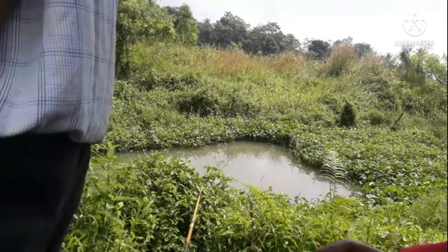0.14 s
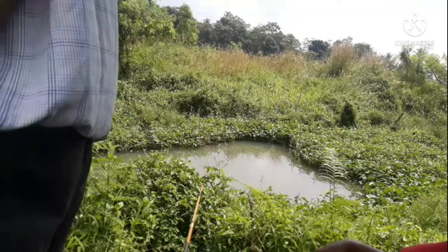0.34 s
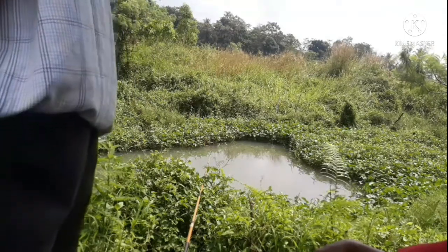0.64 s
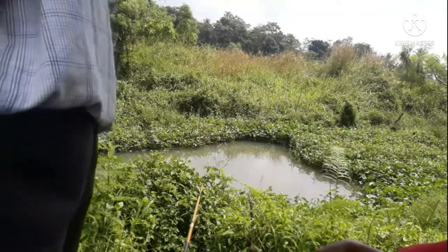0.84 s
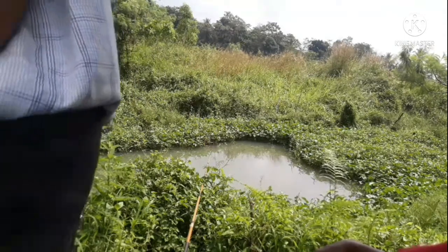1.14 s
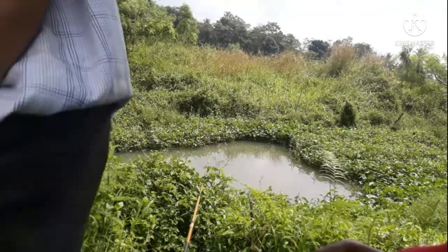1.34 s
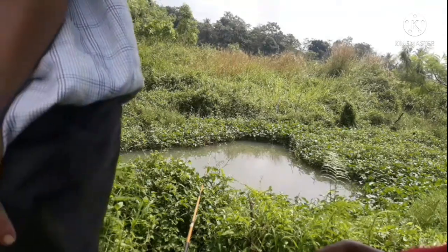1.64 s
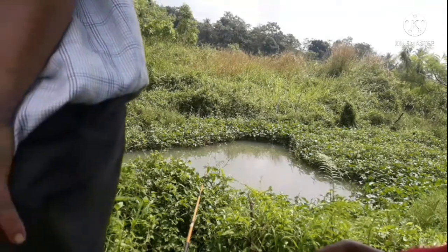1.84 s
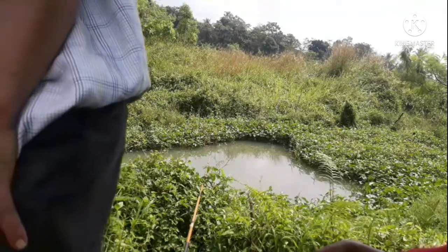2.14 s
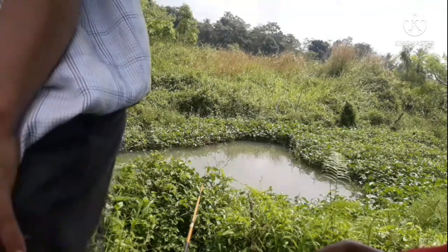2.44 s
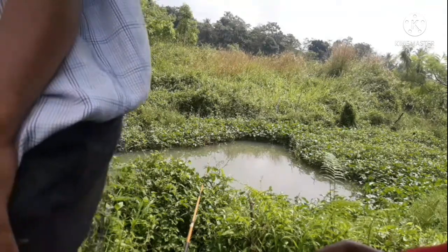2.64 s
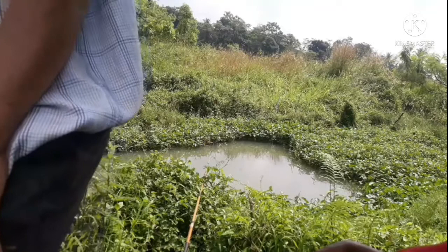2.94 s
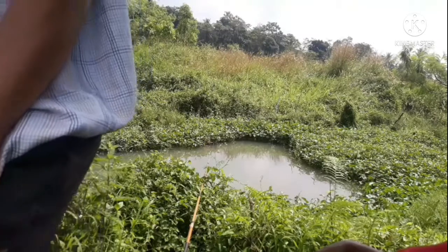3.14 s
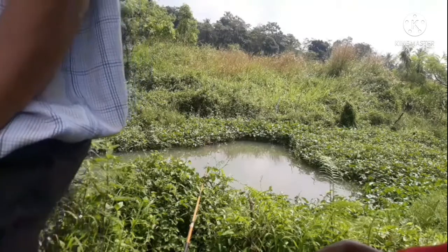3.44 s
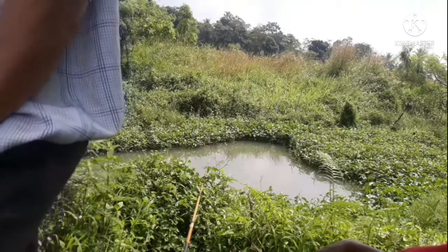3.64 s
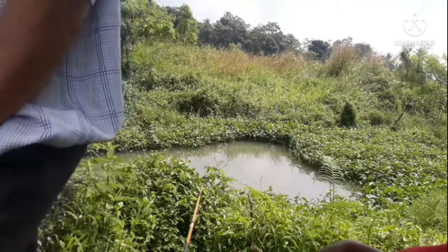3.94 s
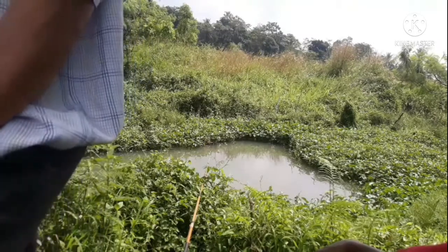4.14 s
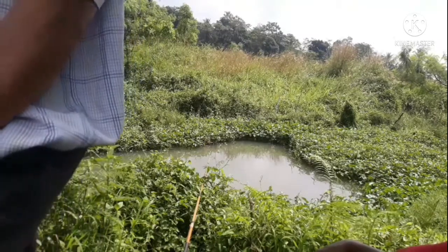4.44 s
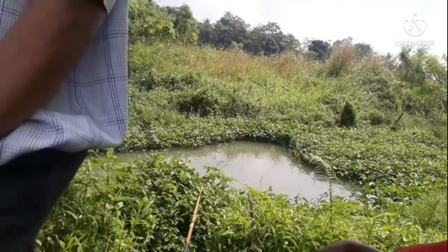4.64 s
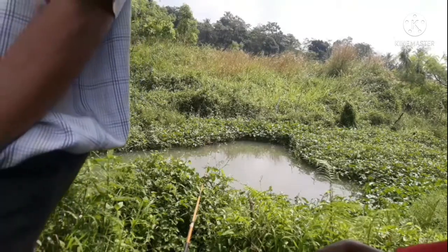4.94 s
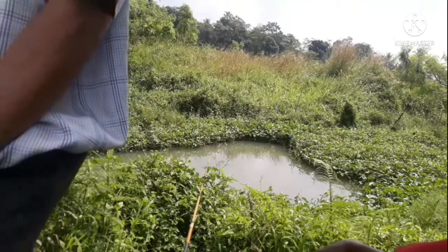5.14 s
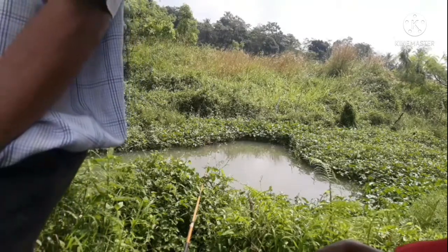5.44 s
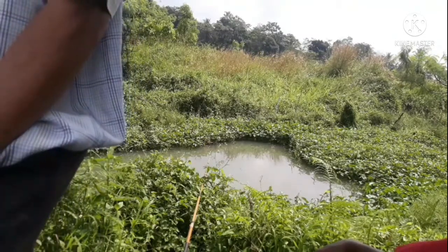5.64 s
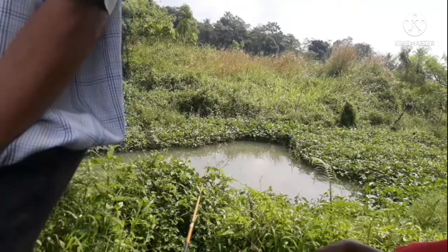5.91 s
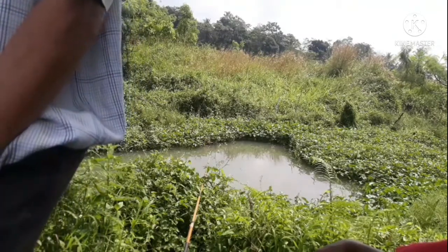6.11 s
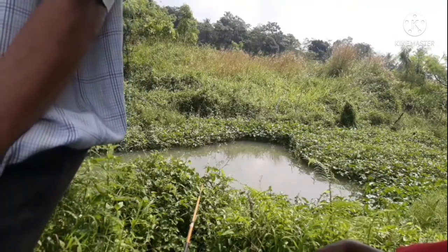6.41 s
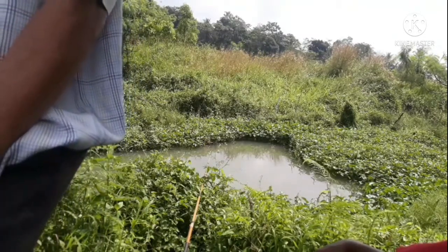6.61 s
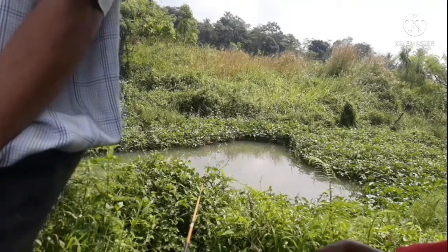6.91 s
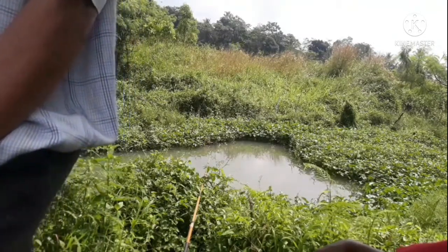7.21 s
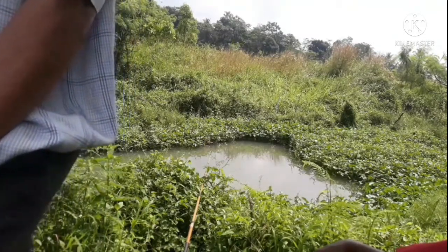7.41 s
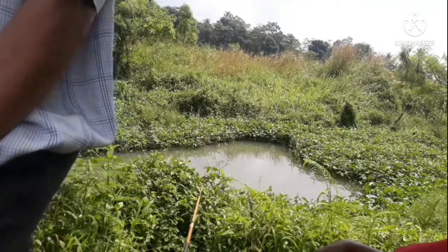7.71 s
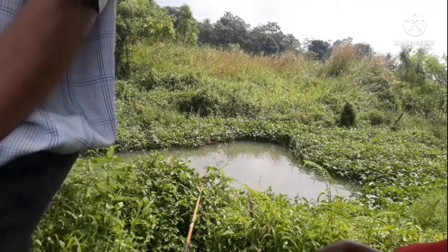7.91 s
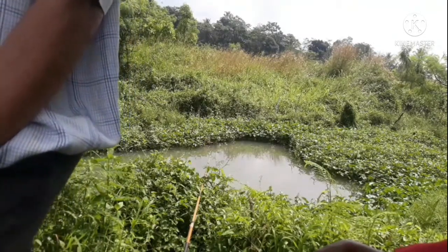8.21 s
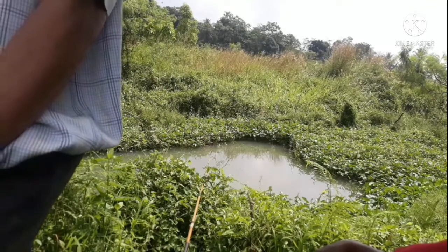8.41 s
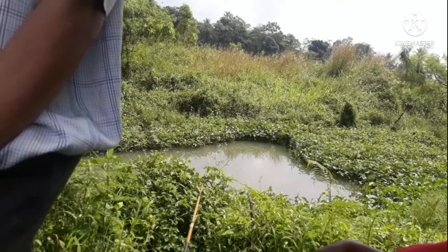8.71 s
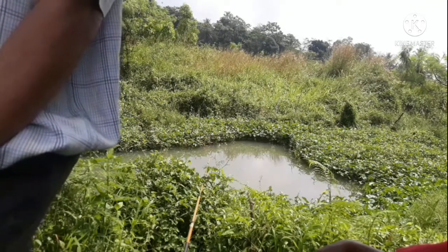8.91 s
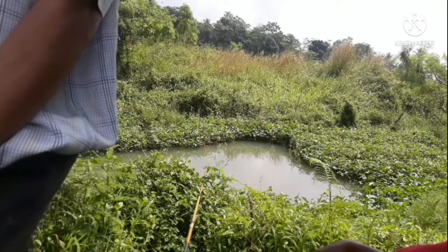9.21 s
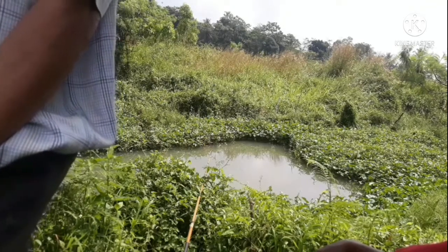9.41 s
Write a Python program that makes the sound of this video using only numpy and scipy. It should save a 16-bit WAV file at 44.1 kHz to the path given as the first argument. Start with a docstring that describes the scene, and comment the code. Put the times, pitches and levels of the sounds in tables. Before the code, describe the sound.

Insects buzz continuously in the weeds by a pond while wind buffets the microphone and faraway birds chirp now and then.

```python
"""An overgrown pond on a breezy day, heard on one microphone. In the weeds a chorus of insects drones
near 5 kHz, each pulsed by its own fast strokes; a thinner, higher one sings in bouts. Small birds
chirp at a distance, scattered by the bushes; there is one low far hoot, and stems tick close by.
Gusts strike the microphone as a rumble with single thumping eddies.
Behind it all lie far land noise, rustling weeds and a fine hiss."""
import sys
import numpy as np
from scipy import signal
from scipy.fft import rfft, irfft, next_fast_len
from scipy.io import wavfile
from scipy.ndimage import uniform_filter1d, map_coordinates

SR = 44100
rng = np.random.default_rng(int(sys.argv[2]) if len(sys.argv) > 2 else 0)


def output_pcm(signal):
    """Save a mono or channel-first signal as 16-bit PCM at the path in sys.argv[1].

    Samples are clipped to [-1, 1] before scaling.
    """
    pcm = np.clip(np.atleast_2d(signal).T, -1, 1) * 32767
    wavfile.write(sys.argv[1], SR, np.round(pcm).astype(np.int16))


N = 421596
TOP_HZ = 15500  # the recorder's band limit


def insect_chorus(count=12, stroke_hz=85, pulsing=.65, waver_hz=17, scrape_hz=48, jitter_hz=22,
                  drift_hz=18):
    """Each insect in the weeds rings at its own pitch, pulsed and bent by fast, uneven strokes."""
    # swell of the chorus: t/s, relative level/dB
    drone = [(0.0, -57.5), (0.53, -55), (0.64, -52.5), (1.01, -57.5), (1.28, -50), (1.84, -56),
             (2.72, -56.5), (2.85, -59), (3.11, -54.5), (3.83, -58), (4.85, -53.5), (6.84, -57),
             (7.72, -54), (7.85, -56.5), (9.56, -54.5)]
    # its tuning: t/s, centre f/Hz, spread between insects/Hz
    tuning = [(0, 4833, 102.1), (1.4, 4830, 88.02), (5.2, 4860, 76.03), (6.5, 4892, 84.9), (7.8, 4890, 103),
              (9.56, 4860, 115.1)]
    centre_hz, spread_hz = curves(tuning)
    places = np.linspace(-1, 1, count)
    chorus = np.zeros(N)
    for place in unit(places + .5 * places ** 3):  # more sing near the centre pitch
        stroke = sine(stroke_hz * np.exp(.35 * rng.standard_normal() + .13 * wobble(30)))
        hz = centre_hz + spread_hz * place + drift_hz * wobble(1.2) + waver_hz * wobble(7)
        hz = hz + scrape_hz * stroke + jitter_hz * wobble(200)
        loudness = amp(2.4 * wobble(2.957) - .94 * place ** 2) * (1 + pulsing * stroke)
        chorus += loudness * sine(hz)
    # the far members merge into a wider buzz, a little lower in pitch
    blur = unit(filtered(rng.standard_normal(N), lambda f: 1 / (1 + (f / 210) ** 4)))
    crowd = unit(blur * sine(centre_hz - 100)) * unit(spread_hz ** 2)
    near = unit(bushes(chorus, wet=.34, t60=.18))
    return amp(curves(drone)[0] + .8) * (near + amp(-8.5) * crowd)


def wind(count=400, breeze_db=-53, slow_hz=97, hz_per_peak=503):
    """Gusts swell and die on the microphone, driving lumpy turbulence and thumping eddies."""
    # bell-shaped gusts: peak t/s, half-length/s, relative level/dB
    gusts = [(.44, 0.19, -55), (0.785, 0.13, -44.5), (1.3, 0.078, -43.5), (3.29, 0.12, -36),
             (3.579, 0.064, -41), (3.786, 0.13, -36.5), (4.177, 0.07, -34.5), (4.333, 0.039, -38),
             (5.3, 0.048, -46.5), (5.51, 0.091, -43.5), (5.742, 0.074, -48), (6.04, 0.08, -42),
             (6.235, .09, -38.5), (6.475, 0.083, -34.5), (6.662, 0.056, -29.5), (7.019, 0.031, -37),
             (7.566, 0.051, -43), (7.96, 0.27, -48.5), (8.723, 0.096, -40.5)]
    # spectrum of the turbulence: f/Hz, relative level/dB
    rumble_colour = [(20, -31.5), (40, -13.5), (65, -1), (100, -2), (150, -7.5), (220, -13), (330, -23),
                     (470, -30.5), (700, -45.5), (1500, -94)]
    # eddies that stand out: t/s, peak level/dB before the bass loss, mid-swing f/Hz
    eddies = [(.531, -29, 97), (0.78, -27, 94.7), (1.22, -29.5, 99), (1.689, -35, 90), (1.9, -30.5, 103),
              (2.463, -37.5, 80), (2.746, -33.5, 80.5), (3.207, -21.5, 130.9), (3.24, -19.5, 112),
              (3.263, -18.5, 164), (3.285, -13, 193), (3.305, -15, 147), (3.567, -21.5, 113),
              (3.616, -20.5, 132), (3.778, -15, 139), (4.145, -22.5, 151), (4.186, -18.5, 145),
              (4.197, -16.5, 201), (4.328, -25, 131), (5.728, -22.5, 130), (5.993, -22, 143),
              (6.058, -22.5, 135), (6.185, -11.5, 160.2), (6.216, -15.5, 215), (6.233, -17, 155),
              (6.46, -17, 140), (6.521, -19.5, 167), (6.606, -14.5, 116), (6.644, -16, 273),
              (6.661, -23, 164), (6.831, -23.5, 100), (7.061, -23.5, 141), (7.166, -25, 96),
              (7.534, -24, 133), (7.886, -28, 91), (7.953, -22.5, 116), (8.402, -26.5, 110),
              (8.709, -22.5, 91), (8.752, -21.5, 114), (8.81, -21.5, 133)]
    t = np.arange(N) / SR
    gust = sum(amp(db) * np.exp(-((t - s) / half) ** 2) for s, half, db in gusts)
    flow = np.hypot(amp(breeze_db + 2 * wobble(8)), amp(-3) * gust)
    rumble = flow * unit(rush(rumble_colour, patchy_db=1.96) * amp(1.43 * wobble(60)))
    # a train of lesser eddies follows the gusts; a stronger one swings faster
    times = (np.arange(count) + rng.uniform(size=count)) * t[-1] / count
    peaks = np.interp(times, t, gust) * amp(10.5 + 3 * rng.standard_normal(count))
    lesser = zip(times, peaks, slow_hz + hz_per_peak * peaks)
    strong = [(s, amp(db), hz) for s, db, hz in eddies]
    thumps = np.zeros(N)
    for s, peak, hz in [*lesser, *strong]:
        swing = peak * eddy(hz)
        add(thumps, s - len(swing) / 2 / SR, swing)
    return rumble + filtered(thumps, lambda hz: hz / np.hypot(hz, 65))  # the microphone loses deep bass


def eddy(hz, rise_cycles=.23, fall_cycles=.58):
    """One eddy swings the pressure once or twice, with a peak of 1, centred in a tenth of a second."""
    cycles = hz * np.arange(-SR // 20, SR // 20) / SR
    swell = 1 / (np.exp(-cycles / rise_cycles) + np.exp(cycles / fall_cycles))
    slowing = .3 * np.hypot(cycles, .5)  # the swing starts fast and slackens
    swing = swell * np.cos(2 * np.pi * (cycles - slowing) + rng.uniform(0, 2 * np.pi))
    return swing / np.abs(swing).max()


def birds(chirp_s=.066, squeak_s=.053, pipe_s=.056, upper_hz=2636, lower_hz=1650, pipe_sag=.048):
    """Small birds chirp, squeak, whistle and pipe from the far bank."""
    # hoarse falling chirps: t/s, top f/Hz, end f/Hz, relative level/dB
    chirps = [(0.142, 4360, 3710, -59), (.465, 4500, 3320, -61), (.607, 3950, 3340, -59),
              (.7, 4640, 3990, -54), (1.055, 4500, 4300, -54), (1.315, 4800, 3200, -53.5),
              (1.59, 4566, 3870, -58), (2.03, 4550, 4220, -50), (2.155, 4120, 3110, -62),
              (2.606, 4890, 4080, -49), (3.112, 4300, 3830, -58), (3.346, 3640, 3280, -60),
              (3.668, 5210, 3010, -51), (3.755, 4690, 3030, -54), (4.25, 4770, 3450, -57),
              (4.755, 4256, 3680, -62), (5.844, 4780, 3230, -51), (5.93, 4680, 3000, -53),
              (7.425, 4170, 3200, -60), (8.36, 3750, 2870, -67)]
    # high calls that flick up and sag: t/s, top f/Hz, relative level/dB
    squeaks = [(1.447, 7050, -60), (7.46, 6760, -60), (9.095, 6580, -63)]
    # whistles on one pitch: t/s, length/s, f/Hz, relative level/dB
    whistles = [(.499, 0.089, 1555, -70.5), (1.235, 0.026, 5460, -58), (2.39, 0.096, 5240, -54),
                (4.34, 0.092, 4300, -54), (5.2, 0.19, 3794, -67.5)]
    # upper notes, each answered by a lower one: t/s, relative level/dB of the upper, of the lower
    piping = [(6.055, -66.5, -65), (6.284, -64.5, -72), (6.527, -64, -65.5), (6.759, -61, -70),
              (6.987, -61.5, -74)]
    song = np.zeros(N)
    for s, top_hz, end_hz, db in chirps:
        rasp_hz = .11 * (top_hz - end_hz)
        add(song, s, amp(db) * bird_note(chirp_s, top_hz, end_hz, flick=.703, rasp_hz=rasp_hz))
    for s, hz, db in squeaks:
        add(song, s, amp(db) * bird_note(squeak_s, hz, hz - 256, flick=3.47, rasp_hz=101))
    for s, length, hz, db in whistles:
        add(song, s, amp(db) * bird_note(length, hz, hz, flick=0, rasp_hz=60))
    for s, upper_db, lower_db in piping:
        for lag, hz, db in [(0, upper_hz, upper_db), (pipe_s, lower_hz, lower_db)]:
            note = bird_note(pipe_s, hz, hz * (1 - pipe_sag), flick=.6, rasp_hz=.034 * hz)
            add(song, s + lag, amp(db) * note)
    return song


def bird_note(length, top_hz, end_hz, flick, rasp_hz):
    """A note from a distance: near weeds blur it, the line of trees adds a longer tail."""
    note = whistle(length, top_hz, end_hz, flick, rasp_hz, rough_db=2.5)
    blurred = bushes(np.pad(note, (0, SR // 2)), wet=.6, t60=.08)
    return amp(3.5) * bushes(blurred, wet=.29, t60=.54)


def whistle(length, start_hz, end_hz, flick=0, rasp_hz=0, rough_db=0):
    """A note flicks up by a share of its fall, then glides; hoarseness shakes pitch and strength."""
    u = np.linspace(0, 1, max(int(length * SR), 8))
    glide = np.interp(u, [0, .18, .5, 1], [1 - flick, 1, .45, 0])
    shake, flutter = (np.interp(u, np.linspace(0, 1, 24), row) for row in rng.standard_normal((2, 24)))
    hz = end_hz + (start_hz - end_hz) * glide + rasp_hz * shake
    swell = np.abs(np.sin(np.pi * u)) ** .31 * amp(-8 * u + rough_db * flutter)
    return swell * sine(hz)


def low_calls():
    """One soft far hoot and later a short blip, both through the bushes."""
    calls = np.zeros(N)
    add(calls, 2.1, amp(-54.5) * whistle(length=.38, start_hz=282, end_hz=283.3))
    add(calls, 8.64, amp(-57.5) * whistle(length=.0243, start_hz=1080, end_hz=900))
    return bushes(calls, wet=.15, t60=.62)


def stem_ticks(t60=.082, attack_s=.00059):
    """Dry stems tick close to the microphone, each a tiny, soft-edged burst of noise."""
    # the ticks: t/s, level/dB before colouring
    ticks = [(1.23, -55), (1.2584, -51), (1.552, -58), (2.375, -57.5), (2.917, -61), (5.6915, -60.5),
             (7.7415, -66), (8.193, -59.5), (8.3534, -62), (8.6544, -63.5), (9.0233, -60.5)]
    # their colour: f/Hz, gain/dB
    tick_colour = [(700, -12), (2500, 2), (5000, 16), (7500, 1), (9500, -11), (15000, -19)]
    track, t = np.zeros(N), np.arange(SR // 10) / SR
    for s, db in ticks:
        envelope = amp(db - 60 * t / t60) * (1 - np.exp(-t / attack_s))
        add(track, s, envelope * rng.standard_normal(len(t)))
    return filtered(track, tick_colour)


def thin_insect(pulse_hz=19.2, sharpness=.5, swell_db=6.5, fade_s=.08):
    """One faint, high insect rasps in pulses through narrow resonances; each bout swells, then stops."""
    # its bouts: start t/s, end t/s, level/dB it swells towards
    bouts = [(.1, .65, -82), (3.104, 4.697, -82.5), (4.7, 5.849, -76), (6.25, 6.65, -85.5),
             (7.1, 7.496, -77), (7.75, 8.25, -79)]
    # its resonances: f/Hz, width/Hz, relative level/dB
    resonances = [(7800, 130, -12), (8040, 140, -4.5), (8770, 220, -11.5)]
    t, level = np.arange(N) / SR, np.zeros(N)
    for start, end, db in bouts:
        singing = np.clip(np.minimum(t - start, end - t) / fade_s + .5, 0, 1)
        level += singing * amp(db + np.interp(t, [start, end], [-swell_db, 0]))
    body = lambda f: sum(amp(db) / (1 + ((f - hz) / width) ** 2) ** 2 for hz, width, db in resonances)
    stroke = sine(pulse_hz + .5 * wobble(3.3))
    pulses = np.exp(sharpness * stroke) / np.sqrt(np.i0(2 * sharpness))  # rms 1
    return level * pulses * unit(filtered(rng.standard_normal(N), body))


def background():
    """The air around the pond: far land noise, the rustle of the weeds and a fine high hiss."""
    # spectra of the land, the weeds and the hiss: f/Hz, relative level/dB
    land_colour = [(30, -8), (120, -2.5), (270, -3), (420, -10.5), (700, -14), (1200, -21.5), (2200, -27.5),
                   (5000, -30.5), (8000, -30.5), (9200, -33.5), (15000, -44.5)]
    weed_colour = [(600, -20.5), (1500, -11.5), (2300, -11), (2850, -6.5), (3400, -7), (3900, -0.5),
                   (4550, 3), (5300, -3), (5600, -4.5), (5880, -2.5), (6200, -7.5), (7500, -13),
                   (8100, -17), (9000, -31)]
    hiss_colour = [(7000, -32.5), (9500, -24.5), (11500, -11.5), (13000, -7.5), (14500, -1.5), (15400, 1.5)]
    # rise and fall of the rustle and the hiss: t/s, relative level/dB
    rustle_level = [(0.0, -70), (1.44, -63.5), (1.62, -68), (2.98, -69.5), (3.25, -65.5), (3.8, -69),
                    (3.99, -68), (4.9, -70), (6.95, -68.5), (7.19, -70), (8.47, -70), (9.56, -70.5)]
    hiss_level = [(0.0, -74.5), (1.14, -75), (1.22, -72.5), (1.92, -76.5), (4.79, -73), (6.07, -77),
                  (8.17, -73), (9.16, -77), (9.56, -76)]
    land = amp(-64.5) * rush(land_colour, patchy_db=2.47)
    weeds = amp(curves(rustle_level)[0] + 3.5) * rush(weed_colour, patchy_db=2.5)
    hiss_gain = amp(curves(hiss_level)[0] + .4 * wobble(15))
    hiss = unit(filtered(rush(hiss_colour, patchy_db=0), lambda hz: hz < TOP_HZ))
    return land + weeds + hiss_gain * hiss


def bushes(x, wet, t60):
    """Leaves and trunks scatter a far sound into a diffuse tail, new each time."""
    t = np.arange(SR // 2) / SR
    tail = rng.standard_normal(len(t)) * amp(-60 * t / t60)
    scattered = signal.fftconvolve(x, tail / np.linalg.norm(tail))[:len(x)]
    return np.sqrt(1 - wet) * x + np.sqrt(wet) * scattered


def rush(spectrum, patchy_db):
    """Coloured noise of rms 1 with patches of gain drifting over frequency and time."""
    cells = signal.stft(rng.standard_normal(N), nperseg=512)[2]
    patches = uniform_filter1d(rng.standard_normal(cells.shape), size=6, axis=0)
    patches = unit(uniform_filter1d(patches, size=16, axis=1))
    noise = signal.istft(cells * amp(patchy_db * patches), nperseg=512)[1][:N]
    return unit(filtered(noise, spectrum))


def filtered(x, response):
    """Shape x by a gain function of frequency, or by (f/Hz, gain/dB) points on a log axis."""
    size = next_fast_len(N + 8192)
    hz = np.fft.rfftfreq(size, 1 / SR)
    if callable(response):
        gain = response(hz)
    else:
        f, db = np.transpose(response)
        gain = amp(np.interp(np.log(hz + 1), np.log(f), db))
    return irfft(rfft(x, size) * gain, size)[:N]


def wobble(rate):
    """A smooth random curve, rate knots a second."""
    knots = rng.standard_normal(int(N * rate / SR) + 4)
    coarse = np.arange(0, N + 32, 32)
    return np.interp(np.arange(N), coarse, map_coordinates(knots, [coarse * rate / SR]))


def curves(rows):
    """One value per sample for each column after the time."""
    s, *cols = np.transpose(rows)
    return [np.interp(np.arange(N) / SR, s, c) for c in cols]


def sine(hz):
    """A sine that follows a frequency curve."""
    return np.sin(2 * np.pi * np.cumsum(hz) / SR)


def amp(db):
    """Decibels to gain."""
    return 10 ** (np.asarray(db) / 20)


def unit(x):
    """Scale to rms 1."""
    return x / np.sqrt(np.mean(x ** 2) + 1e-20)


def add(track, s, sound):
    """Mix a sound into the track from time s."""
    part = track[max(round(s * SR), 0):][:len(sound)]
    part += sound[:len(part)]


def scene():
    """The pond as it meets one microphone."""
    animals = insect_chorus() + thin_insect() + birds() + low_calls()
    return (animals + stem_ticks() + wind() + background())[None]


def record(dry):
    """The recorder keeps nothing above its band limit."""
    return filtered(dry[0], lambda hz: hz < TOP_HZ)[None]


dry = scene()
out = record(dry)
output_pcm(out)
```